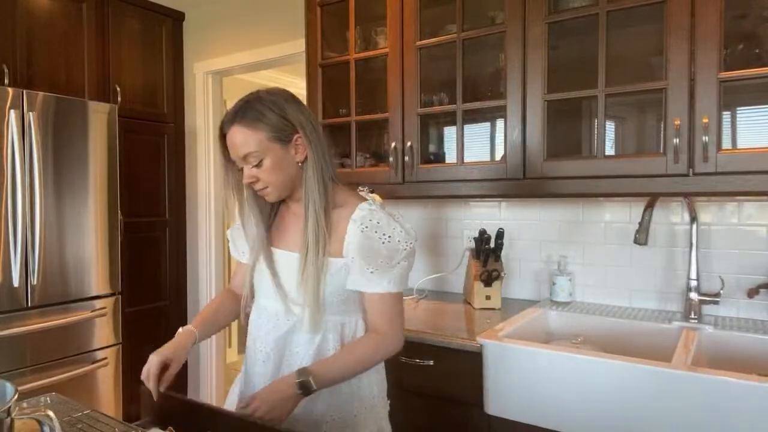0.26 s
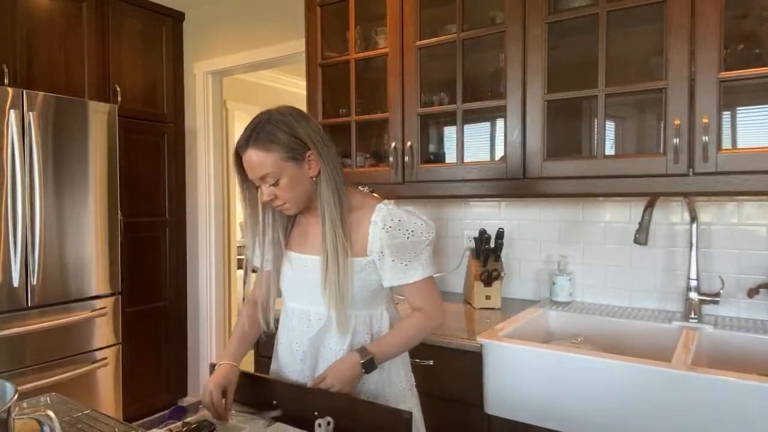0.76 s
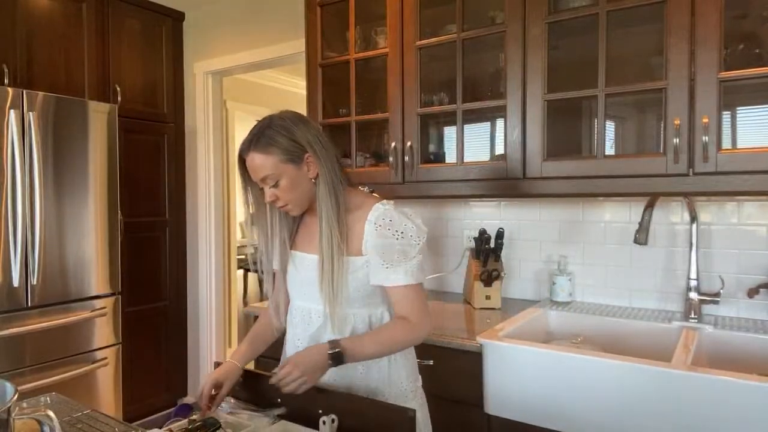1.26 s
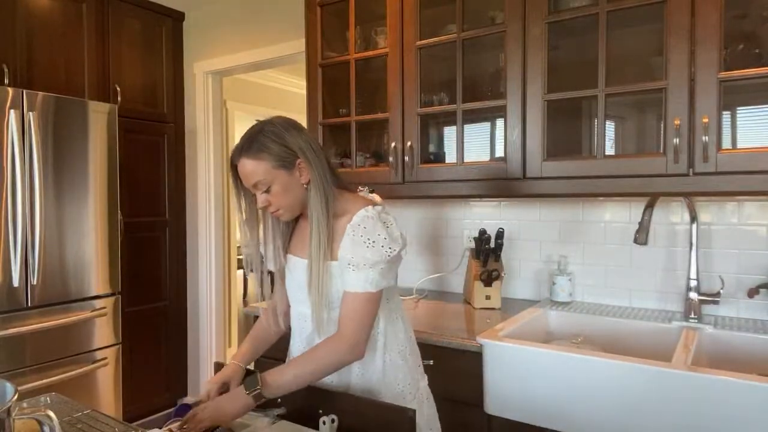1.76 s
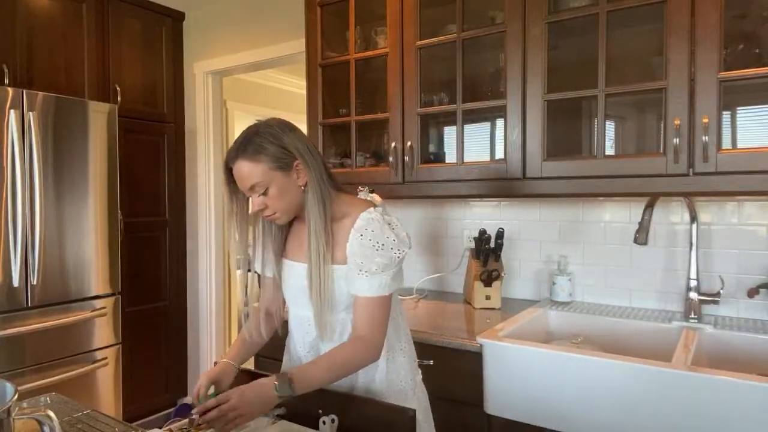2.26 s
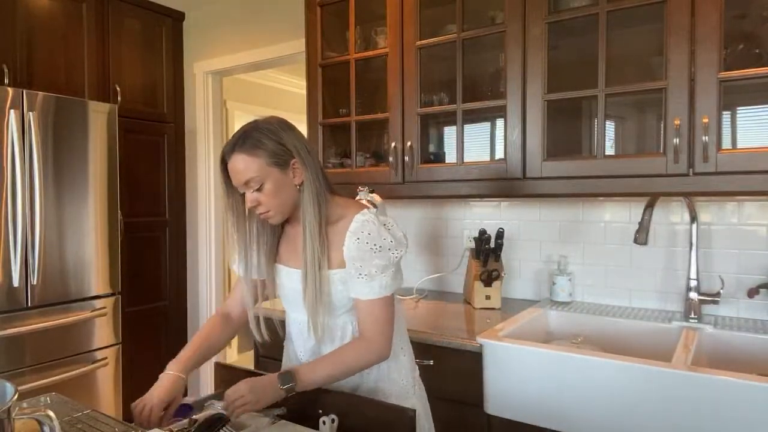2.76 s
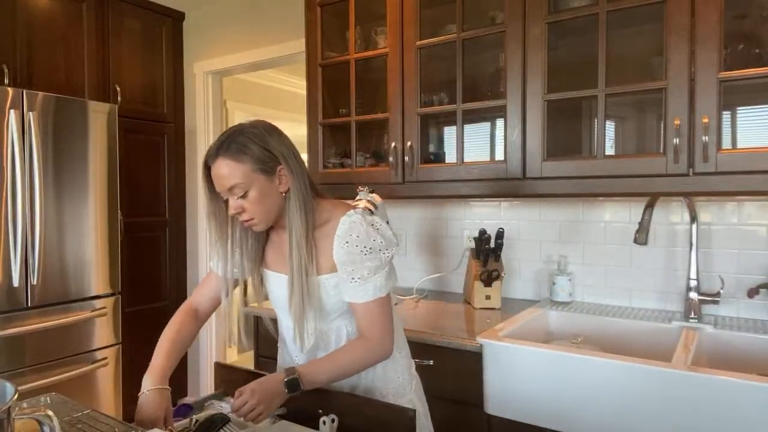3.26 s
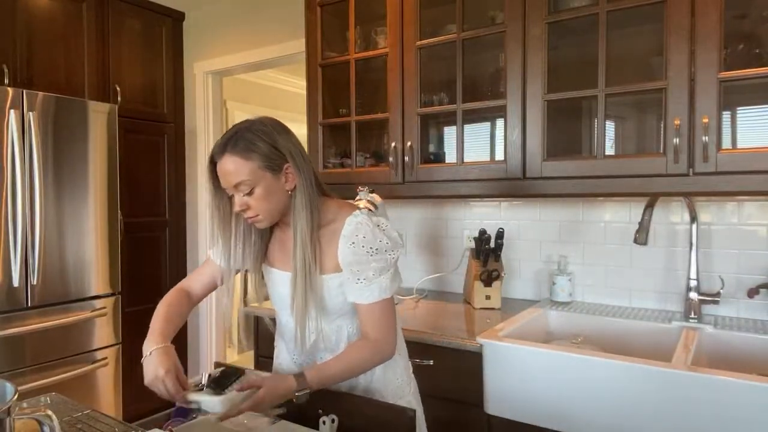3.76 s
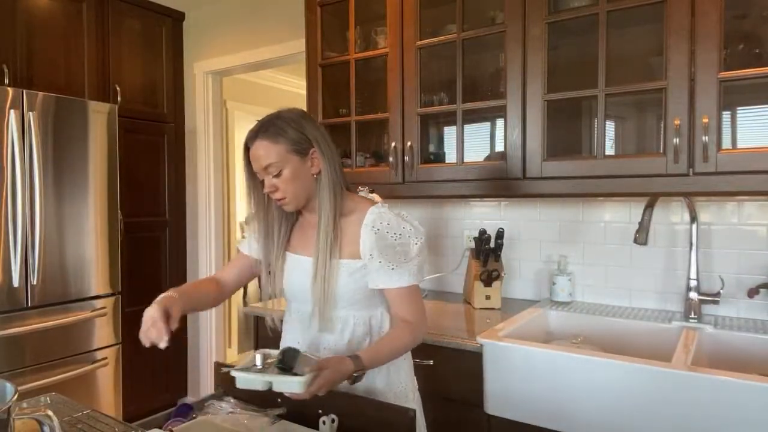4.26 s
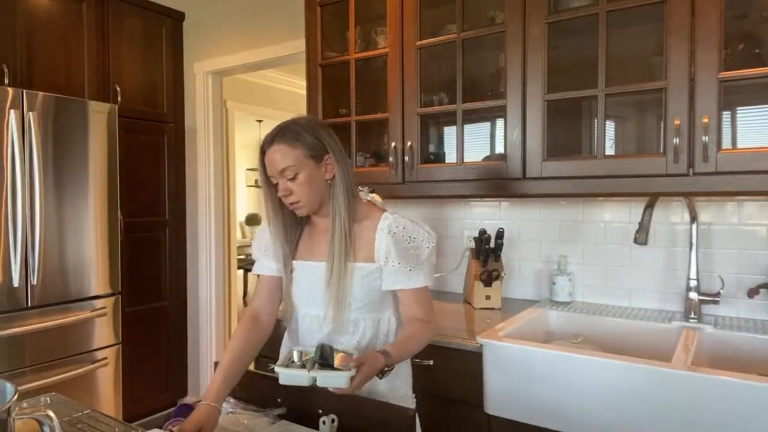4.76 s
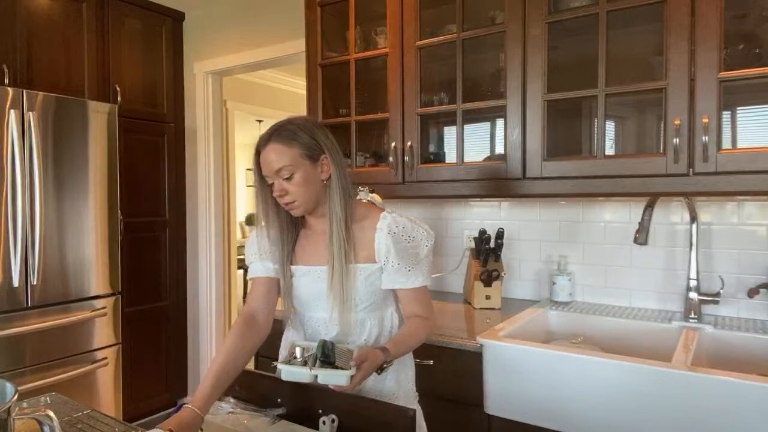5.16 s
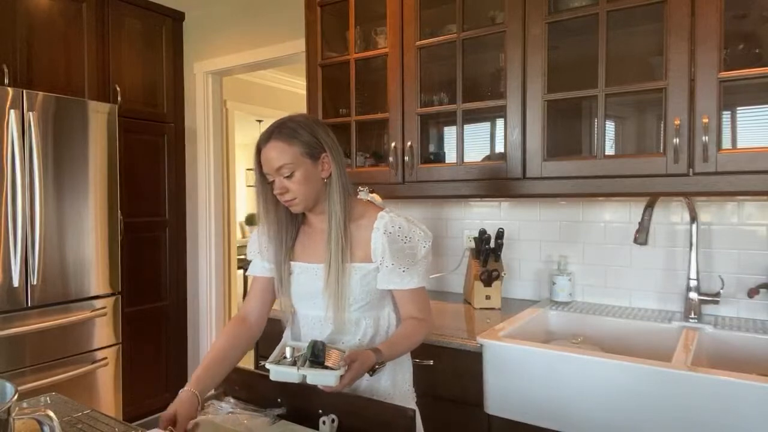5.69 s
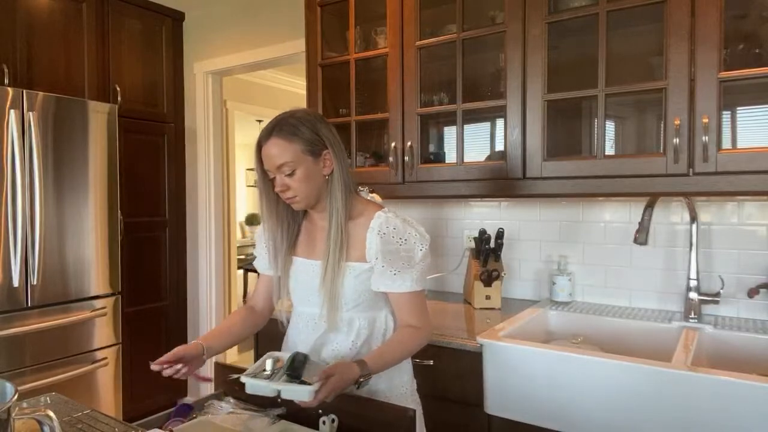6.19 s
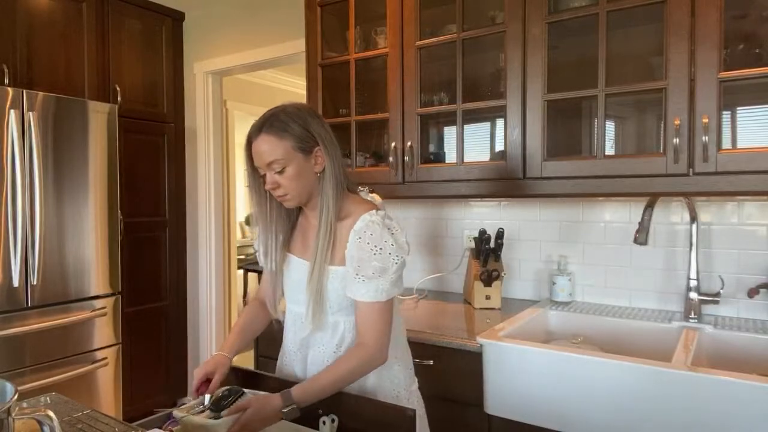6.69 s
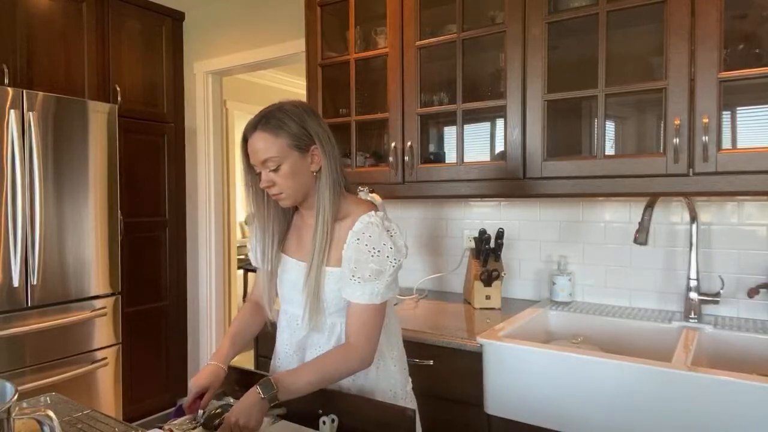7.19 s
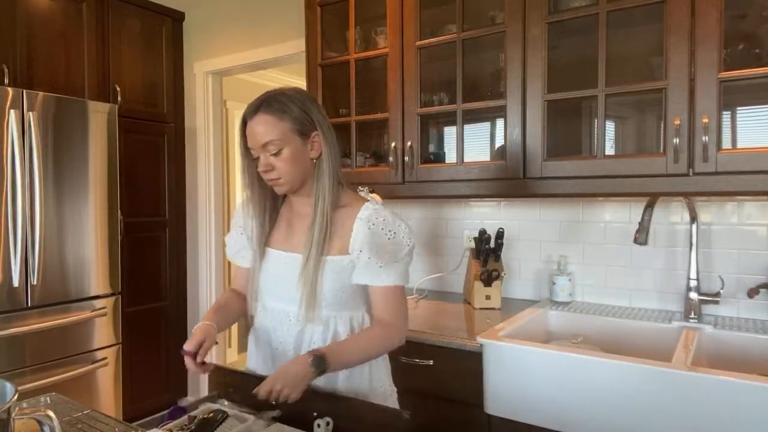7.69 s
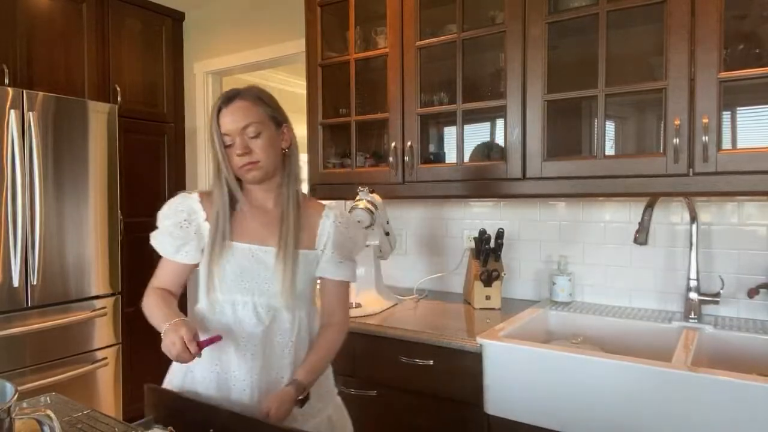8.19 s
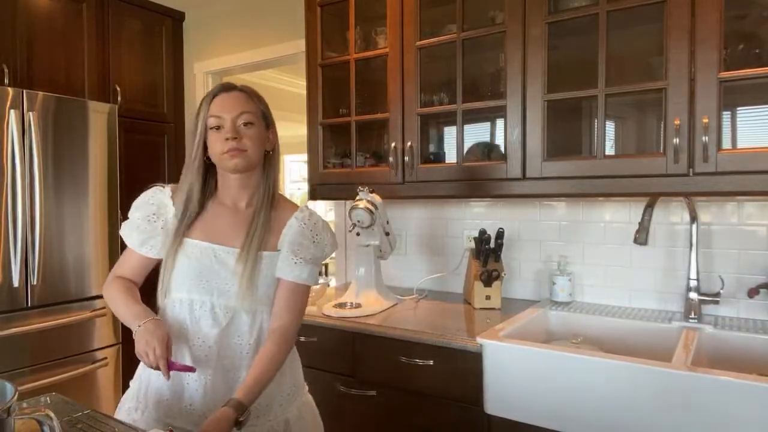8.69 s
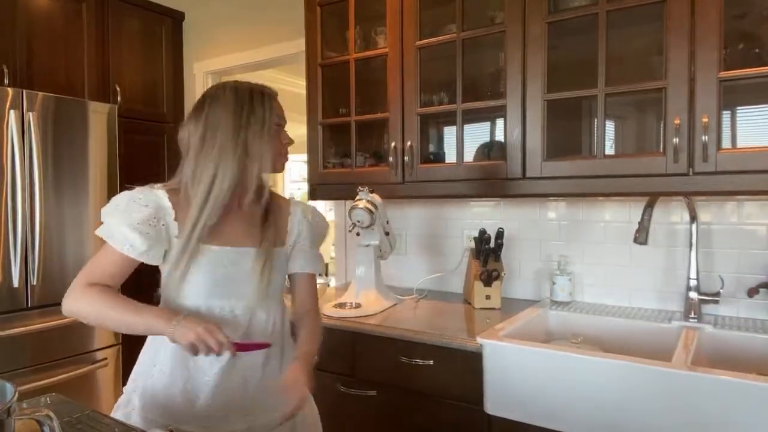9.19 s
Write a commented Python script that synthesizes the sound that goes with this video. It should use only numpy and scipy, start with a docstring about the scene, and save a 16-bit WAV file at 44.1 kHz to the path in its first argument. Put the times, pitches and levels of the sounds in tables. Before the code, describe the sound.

A wooden kitchen drawer rolls open, utensils clack, scrape and clink in a plastic tray, then the drawer rolls back and thuds shut.

```python
"""Searching a kitchen drawer

A wooden drawer rolls open on rumbling runners; someone rummages in its plastic utensil tray.
Struck modes make knocks, clinks and handle taps; random slips make slides. The drawer rolls back and thuds shut.
The hard kitchen adds a decaying noise tail, over faint air noise and wavering hum tones.
Both channels are alike; twice the sound fades quickly to silence and snaps back."""
import sys
import numpy as np
from scipy import signal
from scipy.fft import rfft, irfft
from scipy.io import wavfile

SR = 44100
rng = np.random.default_rng(int(sys.argv[2]) if len(sys.argv) > 2 else 0)


def materialize(psi):
    """Save the field psi as 16-bit PCM at rate SR to the path in sys.argv[1].

    A 1-D psi becomes a single channel; in a 2-D psi each row is a channel.
    """
    bounded = np.clip(np.atleast_2d(psi).T, -1, 1)
    quanta = np.round(bounded * 32767).astype(np.int16)
    wavfile.write(sys.argv[1], SR, quanta)


N = 416304
TIME = np.arange(N) / SR
RING = TIME[:SR // 2]  # time axis of one struck sound, s
TOP_HZ = 15800  # upper edge of the whole sound
MIDDLE_NOTE_HZ = 879  # note of a utensil of middling weight

# utensils sliding over each other; levels are relative, ahead of the slide trim and the room:
# start_s, end_s, body_db, hiss_db, resonance_hz of the rubbed piece
UTENSIL_SLIDES = [(0.255, 0.436, -56.5, -73, 5600), (1.648, 1.756, -52.5, -56.5, 5270),
                  (1.742, 1.8, -42, -44.5, 13400), (2.42, 2.505, -58, -78, 1116),
                  (3.019, 3.15, -61, -79, 4950), (3.142, 3.173, -45.5, -49, 3000),
                  (3.215, 3.277, -53, -56.5, 4900), (3.265, 3.348, -53, -53, 5300),
                  (3.417, 3.501, -60, -70, 13000), (4.045, 4.206, -54, -68.5, 1350),
                  (4.75, 4.973, -60, -68, 1300), (4.952, 5.08, -46.5, -56.5, 1540),
                  (5.216, 5.28, -45.5, -51.5, 9200), (5.285, 5.353, -53.5, -54.5, 2540),
                  (5.42, 5.672, -48, -61.5, 515), (5.723, 5.77, -52, -69, 560),
                  (5.777, 5.848, -47, -57, 1870), (5.832, 5.945, -46.5, -56, 3270),
                  (6.925, 7.255, -54.5, -72, 1100), (8.757, 8.791, -53, -54, 7600),
                  (8.808, 8.848, -49, -52.5, 10000), (8.85, 8.932, -54.5, -65, 4050),
                  (9.115, 9.23, -59, -51.5, 13900), (9.363, 9.406, -47.5, -52.5, 4260)]


def undb(db):
    """Decibels to gain."""
    return 10 ** (np.asarray(db) / 20)


def unit(x):
    """Scale to rms 1."""
    return x / np.sqrt(np.mean(x ** 2))


def blow(x):
    """Scale a transient to the energy of one millisecond at rms 1."""
    return x / np.sqrt(np.sum(x ** 2) / (SR / 1000))


def add(track, s, x):
    """Mix x into the track from time s."""
    i = max(int(s * SR), 0)
    track[i:i + len(x)] += x[:max(N - i, 0)]


def along(points, hz):
    """Read (Hz, value) points on a log-frequency axis."""
    f, value = np.transpose(points)
    return np.interp(np.log(hz + 1), np.log(f), value)


def colour(x, points):
    """Causal filter with the given spectrum, built from its cepstrum."""
    size = 4096
    level_db = along(points, np.fft.rfftfreq(size, 1 / SR))
    cepstrum = irfft(np.log(undb(level_db)))
    # fold the cepstrum forward in time for minimum phase
    cepstrum[1:size // 2] *= 2
    cepstrum[size // 2 + 1:] = 0
    impulse = irfft(np.exp(rfft(cepstrum)))
    return signal.fftconvolve(x, impulse)[:len(x)]


def band(x, hz, kind, order=2):
    """Butterworth filter."""
    return signal.sosfilt(signal.butter(order, hz, kind, fs=SR, output="sos"), x)


def decay(t, t60):
    """Exponential fall of 60 dB in t60 seconds."""
    return np.exp(-np.log(1000) * t / t60)


def ring(modes, scatter_db, detune):
    """Decaying modes; where the blow lands changes each one's strength, sign and, slightly, pitch."""
    hz, db, t60 = np.transpose(modes)[:, :, None]
    strength, pitch, side = rng.standard_normal((3, len(modes), 1))
    waves = np.sin(2 * np.pi * hz * (1 + detune * pitch) * RING) * np.sign(side)
    envelopes = undb(db + scatter_db * strength - 60 * RING / t60)
    return blow(np.sum(envelopes * waves, axis=0))


def contact(chatter_s, rebound=.5, count=4):
    """One push broken into a train of tiny rebounds by a chain of all-pass echoes."""
    hz = np.fft.rfftfreq(len(RING), 1 / SR)
    delay_samples = np.ceil(SR * chatter_s * rng.uniform(.1, 1, (count, 1)))
    echo = np.exp(-2j * np.pi * hz * delay_samples / SR)
    keep = np.clip(rebound, 0, .8)
    all_passes = (echo - keep) / (1 - keep * echo)
    return blow(irfft(np.prod(all_passes, axis=0)))


def grains(rate, spread_db):
    """Tiny slips at random moments (rate per second), a few of them much stronger than the rest."""
    size = undb(spread_db * np.minimum(rng.exponential(size=N), 4))
    return unit((rng.random(N) < rate / SR) * size * rng.choice([-1, 1], N))


def walk(rate):
    """Slow random wandering through `rate` knots per second, with a spread near 1."""
    knots = rng.standard_normal(1000)
    return np.interp(TIME * rate, np.arange(len(knots)), knots)


def kitchen(x, direct_db, room_db, early_db, first_s=0.00094, build_s=0.0032, early_s=0.012):
    """Direct sound, early reflections from drawer and counter, then a noise tail whose mids last longest."""
    # decay time of the room tail in each band: centre_hz, t60_s
    room_decay = [(125, 0.24), (400, 0.42), (1000, 0.5), (2500, 0.55), (5000, 0.49), (9000, 0.4),
                  (15000, 0.24)]
    t = TIME[:SR * 3 // 4]
    hz, spectrum = np.fft.rfftfreq(2 * len(t), 1 / SR), rfft(rng.standard_normal(2 * len(t)))
    tail = 0
    for centre, t60 in room_decay:
        share = along([(f, f == centre) for f, _ in room_decay], hz)  # crossfade between bands
        tail = tail + irfft(spectrum * share)[:len(t)] * decay(t, t60)
    early_boost = 1 + undb(early_db) * np.exp(-t / early_s)
    tail *= np.clip((t - first_s) / build_s, 0, 1) * early_boost
    tail /= np.sqrt(np.sum(tail ** 2))
    return undb(direct_db) * x + undb(room_db) * signal.fftconvolve(x, tail)[:N]


def background(air_db=-58, air_waver_db=0.8, hum_db=-2):
    """Gently wavering air noise and the wavering tones of a running appliance."""
    # spectrum of the air noise, relative: frequency_hz, density_db per Hz
    air_spectrum = [(15, -78), (25, -61.5), (71, -10.5), (110, -9.5), (140, -2), (240, -2.5), (322, -4.5),
                    (349, -7.5), (457, -6), (666, -10.5), (1140, -14), (1270, -13), (1750, -18),
                    (2230, -19), (15500, -40)]
    # appliance tones ahead of the hum trim: pitch_hz, level_db
    hum_tones = [(242.2, -69.5), (360.7, -77), (651.4, -67.5), (1012, -74.5), (1308, -74.5), (2164, -83)]
    air = unit(colour(rng.standard_normal(N), air_spectrum))
    air *= undb(air_db + air_waver_db * walk(rate=8.7))
    hum = np.zeros(N)
    for hz, db in hum_tones:
        waver = walk(rate=12) + 1j * walk(rate=11)  # wanders in level and phase
        hum += undb(db) * unit(np.real(waver * np.exp(2j * np.pi * hz * TIME)))
    return air + undb(hum_db) * hum


def drawer_roll(speed_up_s=0.017, coast_db_per_s=117, bump_db=2):
    """Bearings rumble over small bumps in the runners; each stroke speeds up, holds and coasts to rest."""
    # spectrum of the rolling rumble, relative: frequency_hz, density_db per Hz
    runner_spectrum = [(35, -70.5), (60, -15), (102, -12.5), (139, -7), (210, -5), (272, 1), (351, -13.5),
                       (403, 1.5), (509, -8.5), (810, -10.5), (1350, -17.5), (1960, -26), (2470, -26),
                       (5580, -32.5), (15500, -40)]
    # pulls and pushes ahead of the room; the coast follows the end: start_s, end_s, rumble_db
    roll_strokes = [(0, 0.514, -50.5), (7.789, 8.697, -53), (8.763, 8.843, -46.5)]
    rumble = unit(colour(grains(rate=4000, spread_db=3.0), runner_spectrum))
    strokes = []
    for start, end, db in roll_strokes:
        speed_up = np.clip((TIME - start) / speed_up_s, 0, 1)
        coast = undb(db - coast_db_per_s * np.maximum(TIME - end, 0))
        strokes.append(speed_up * coast)
    return rumble * np.max(strokes, axis=0) * undb(bump_db * walk(rate=22))


def drawer_blows():
    """Light bumps, then three blows per landing: (s, dB, lowest Hz, cut-off Hz, panel ring dB, boom dB)."""
    # the open drawer bumping in its runners: start_s, level_db, cutoff_hz of the contact, boom_db of the box
    runner_bumps = [(0.066, -34, 1000, -22), (0.08, -31, 450, -19), (0.196, -37, 300, -3),
                    (3.255, -35.5, 497, -16), (4.95, -36, 398.2, 0.5), (5.133, -28, 377, -16),
                    (5.149, -27.5, 418, -18), (5.226, -38.5, 300, -1), (5.44, -33.5, 410, -7),
                    (5.715, -33, 700, -19), (5.834, -33.5, 400, -3), (7.258, -24, 494, -7),
                    (7.985, -34.5, 450, -20.5), (8.036, -40, 302, 0.5)]
    # the drawer shuts, springs back and lands again; base values that each landing blow alters:
    # start_s, level_db, cutoff_hz of the contact, boom_db
    shut_landings = [(9.092, -11.5, 5430, 1), (9.265, -25, 730, 8)]
    # the front strikes, the box follows, the load settles; levels and boom add to those of the shut:
    # delay_s, level_db, cutoff_share (ratio), panel_ring_db, boom_db
    landing_blows = [(0, 2, 1.07, -4.5, -31), (.008, -3, 1.4, 4.5, -5), (0.0217, -10.5, 0.17, 1, 5)]
    # a light bump barely rings the panels, and its wood sound carries no deep bass
    blows = [(s, db, 132, hz, -13.5, boom_db) for s, db, hz, boom_db in runner_bumps]
    for s, db, hz, box_db in shut_landings:
        for delay, blow_db, share, panel_db, boom_db in landing_blows:
            # shutting shakes the whole cabinet, so the bass reaches down to 35.2 Hz
            blows.append((s + delay, db + blow_db, 35.2, hz * share, panel_db, boom_db + box_db))
    return blows


def drawer_thuds(boom_hz=148, boom_t60=0.09, swell_s=0.0068):
    """The wooden panels ring, duller under a soft contact; the boom of the whole box swells a little later."""
    # spectrum of the wooden contact, relative: frequency_hz, density_db per Hz
    slam_spectrum = [(60, -2), (150, -1), (400, 1.5), (650, 3.5), (1100, 5.5), (2000, -4.5), (4000, -12),
                     (8000, -15.5), (15500, -9)]
    # resonances of the drawer box, ahead of random scatter: pitch_hz, level_db, t60_s
    panel_modes = [(220, -5, 0.051), (361, 5.5, 0.07), (391, 2, 0.092), (425, -1.5, 0.092),
                   (500, -3, 0.049), (700, -16, 0.065), (887, 1.5, 0.032), (1010, 0, .05),
                   (1020, -11, 0.031), (1150, -22, 0.031), (1345, -4, 0.07)]
    swell = 1 - np.exp(-RING / swell_s)
    boom = blow(np.sin(2 * np.pi * boom_hz * RING) * swell * decay(RING, boom_t60))
    out = np.zeros(N)
    for s, db, lowest_hz, cutoff_hz, panel_db, boom_db in drawer_blows():
        crack = blow(colour(contact(chatter_s=.0018, rebound=0.71), slam_spectrum))
        hit = crack + undb(panel_db) * ring(panel_modes, scatter_db=0.5, detune=0.0043)
        wood = band(hit, lowest_hz, "high", order=4)
        wood = band(wood, min(cutoff_hz, TOP_HZ), "low", order=3)
        add(out, s, undb(db) * (blow(wood) + undb(boom_db) * boom))
    return out


def utensil_slides(split_hz=3800, edge_s=0.0096, jerk_db=3, slide_db=-2, sing_db=3, sharpness=6):
    """Uneven stick and slip: the tray gives the body, the metal the hiss; the rubbed piece lifts its own band."""
    # spectrum of the slips, relative: frequency_hz, density_db per Hz
    scrape_spectrum = [(90, -25.5), (200, 8), (600, 4.5), (1100, -2), (2000, -1), (3300, -6), (4200, -8),
                       (5300, -6.5), (8000, -10.5), (11000, -13), (15500, -23)]
    slips = colour(grains(rate=900, spread_db=5.0), scrape_spectrum) * undb(jerk_db * walk(rate=45))
    out = np.zeros(N)
    for start, end, body_db, hiss_db, hz in UTENSIL_SLIDES:
        during = (TIME > start) & (TIME < max(end, start + edge_s))
        singing = signal.lfilter(*signal.iirpeak(hz, sharpness, fs=SR), slips[during])
        rub = slips[during] + undb(sing_db) * singing
        body = unit(band(rub, split_hz, "low", order=3))
        hiss = unit(band(rub, split_hz, "high", order=3))
        push = np.clip(np.minimum(TIME[during] - start, end - TIME[during]) / edge_s, 0, 1)
        add(out, start, push * (undb(body_db) * body + undb(hiss_db) * hiss))
    return undb(slide_db) * out


def cutlery_clinks(tick_db=-5, clink_db=-1, pinched_db=1.0, pinched_t60=0.008):
    """A bright tick sets a piece ringing until its neighbours damp it; a like piece pinched under it only clacks."""
    # pieces clinking together, ahead of the clink trim and the room: start_s, level_db, piece (name)
    clink_events = [(1.742, -29, "tongs"), (1.771, -46, "tongs"), (2.518, -31, "knife"),
                    (2.519, -35, "tongs"), (3.156, -46, "tongs"), (4.156, -40.5, "spoon"),
                    (4.243, -45.5, "spoon"), (4.906, -48, "knife"), (4.968, -41, "teaspoon"),
                    (5.217, -37.5, "teaspoon"), (5.24, -39.5, "tongs"), (5.655, -46, "teaspoon"),
                    (5.782, -37.5, "knife"), (5.904, -43, "whisk"), (6.967, -43, "peeler"),
                    (7.036, -46.5, "knife"), (7.165, -50, "fork"), (7.2, -46, "fork"), (7.265, -38, "fork"),
                    (8.761, -45, "ladle"), (8.822, -47, "ladle"), (9.115, -40, "whisk")]
    # bending modes of each named piece, ahead of random scatter: pitch_hz, level_db, t60_s
    piece_modes = { "fork": [(2950, 5, 0.06), (7150, -5, .08), (9150, 1, .16), (11280, -3, .08),
                   (12850, 1, 0.1), (13500, 0, .05), (14944, -6, 0.08)], "tongs": [(8200, -6, 0.089),
                   (9000, -5, .15), (10000, 4, .05), (11000, 0, .06), (12700, -12, 0.21), (13000, -1.5, .1),
                   (13695, 4, 0.053), (14944, -4, .18)], "spoon": [(2750, 2, 0.066), (5813, 0, 0.072),
                   (8300, -2, 0.12), (8010, -2, 0.067), (8020, 3, 0.067), (10500, -8, 0.11),
                   (10830, -10, .12), (13565, -8, .1), (14211, 4, .05)], "peeler": [(3100, 8, .02),
                   (3600, 1, .015), (4570, 0, .02), (5070, -3, .03), (7407, -8, .03)],
                   "ladle": [(4010, 5, .1), (4150, 3, .03), (5938, -5, .02), (7550, 3, .012),
                   (9986, -2, .02), (13050, -5, .012), (14300, -4, .012)], "whisk": [(4150, 0, 0.081),
                   (7400, 4, 0.055), (10000, 3, 0.11), (11900, 3, .1), (12273, -3, .1), (14298, 0, .12),
                   (15460, -5, .1)], "teaspoon": [(3260, 14, 0.027), (5840, 1, .04), (6670, -8, .04),
                   (10766, -6, 0.038), (12187, -12, .05), (12700, -11, .06)], "knife": [(1870, 3, 0.067),
                   (6020, 2.5, 0.065), (6270, 0, 0.052), (7550, 1.5, .06), (8290, -1, 0.089),
                   (8720, -7.5, .06), (11757, -14.5, .06), (13700, -13.5, .06)]}
    out = np.zeros(N)
    for s, db, piece in clink_events:
        tick = blow(band(contact(chatter_s=0.0048, rebound=0.37), 4500, "high"))
        free = ring(piece_modes[piece], scatter_db=1.5, detune=.004)
        short_modes = [(hz, mode_db, pinched_t60) for hz, mode_db, _ in piece_modes[piece]]
        pinched = ring(short_modes, scatter_db=2, detune=.025)
        clink = free + undb(pinched_db) * pinched + undb(tick_db) * tick
        add(out, s, undb(db + clink_db) * clink)
    return out


def handle_clacks(clack_db=2, lowest_hz=420, t60=0.018):
    """Plastic and wooden handles tap: three well-damped resonances, no crack, and too small to give bass."""
    # handles tapping each other, ahead of the clack trim and the room:
    # start_s, level_db, first_hz, second_hz, third_hz, tilt_db per octave above the first
    handle_taps = [(0.661, -47, 1410, 2000, 2450, 1), (0.858, -52.5, 1320, 2500, 3140, -4),
                   (1.568, -37, 760, 1420, 2170, -16), (1.586, -35, 750, 1500, 1980, 0),
                   (1.625, -38, 1370, 2220, 3700, -6), (1.876, -35, 1010, 1850, 2880, -6.5),
                   (2.324, -32.5, 580, 1200, 1860, -3), (2.494, -18, 1020, 1710, 2300, -4.5),
                   (2.523, -21, 700, 1020, 1100, -4), (2.541, -25.5, 950, 1900, 2150, -2),
                   (3.15, -35.5, 640, 1330, 2800, -3), (4.243, -36.5, 810, 2010, 3300, -1.5),
                   (6.922, -48.5, 1220, 2870, 3660, -2), (6.967, -38.5, 860, 1390, 2590, -13),
                   (7.026, -37, 835, 1150, 1400, -6), (7.1, -45, 1080, 2210, 2540, 3),
                   (7.163, -41, 860, 1310, 2210, -5), (7.203, -40.5, 1020, 2245, 2600, -4),
                   (7.461, -44, 890, 1340, 1870, -7)]
    out = np.zeros(N)
    for s, db, *notes_hz, tilt_db in handle_taps:
        modes = [(hz, tilt_db * np.log2(hz / notes_hz[0]), t60) for hz in notes_hz]
        add(out, s, undb(db + clack_db) * ring(modes, scatter_db=1, detune=.005))
    return band(out, lowest_hz, "high", order=3)


def jostles(per_s=14, jostle_db=6, spread_db=1, spread_octaves=0.45, hardness_db=-4.5):
    """A sliding utensil jostles its neighbours: soft knocks at random moments, stronger when the slide is."""
    rows = []
    for start, end, body_db, _, _ in UTENSIL_SLIDES:
        waits, sizes, notes = rng.exponential(size=16), rng.standard_normal(16), rng.standard_normal(16)
        moments = start + np.cumsum(waits) / per_s
        for s, size, note in zip(moments, sizes, notes):
            if s < end:
                level_db = body_db + jostle_db + spread_db * size
                note_hz = MIDDLE_NOTE_HZ * 2 ** (spread_octaves * note)
                rows.append((s, level_db, hardness_db, note_hz))
    return rows


def tray_knocks(knocks, bass_hz=400, clack_hz=1600, treble_hz=4200, modes_db=-5, note_db=-7, note_t60=0.045,
                bass_db=-13, body_db=-1, clack_db=-5.5, treble_db=-12):
    """Knocks ring tray and handle; force shifts the bass, hardness lifts clack and treble."""
    # spectrum of the contact, relative: frequency_hz, density_db per Hz
    contact_spectrum = [(80, -34), (160, 2.5), (300, -3), (560, 3), (1050, 3), (1500, -1.5), (2100, -6),
                        (3200, -11), (4500, -16.5), (7000, -19), (11000, -26.5), (15500, -29)]
    # resonances of the plastic tray, ahead of random scatter: pitch_hz, level_db, t60_s
    plastic_modes = [(457, -2.5, 0.077), (580, 5, 0.038), (648, 2, 0.032), (777.6, 7.5, 0.072),
                     (910, -2, 0.086), (1023, 3.5, 0.068), (1100, 0, 0.075), (1200, -7.5, 0.063),
                     (1500, -13, 0.049), (1893, -2.5, 0.07), (1980, -13, 0.035), (2260, -19, .04),
                     (2474, -0.5, .04), (2800, -16, .04)]
    middle_blow_db = -31.5
    # a lighter utensil has a higher note, less bass and more clack
    bass_db_per_octave, clack_db_per_octave = -14, 6.5
    bass_per_force = -0.35  # a faster blow has a shorter contact: dB of bass per dB above a middling blow
    clack_per_hardness = 0.27  # share of the hardness that also lifts the clack
    # longest rebound spacing of a middling knock; this much more force halves it
    middle_chatter_s, chatter_halves_db = .0016, 22
    out = np.zeros(N)
    for s, db, hardness_db, note_hz in knocks:
        lightness = np.log2(note_hz / MIDDLE_NOTE_HZ)  # octaves
        force_db = db - middle_blow_db
        chatter_s = middle_chatter_s * 2 ** (-force_db / chatter_halves_db)
        crack = blow(colour(contact(chatter_s, rebound=0.53), contact_spectrum))
        hit = crack + undb(modes_db) * ring(plastic_modes, scatter_db=2.5, detune=0.015)

        note = blow(np.sin(2 * np.pi * note_hz * RING) * decay(RING, note_t60))
        bass = blow(band(crack, bass_hz, "low", order=4))
        body = blow(band(hit, [bass_hz, clack_hz], "band", order=3))
        clack = blow(band(hit, [clack_hz, treble_hz], "band", order=3))
        treble = blow(band(crack, treble_hz, "high", order=4))

        knock = undb(note_db) * note + undb(body_db) * body
        knock += undb(bass_db + bass_db_per_octave * lightness + bass_per_force * force_db) * bass
        knock += undb(clack_db + clack_db_per_octave * lightness + clack_per_hardness * hardness_db) * clack
        knock += undb(treble_db + hardness_db) * treble
        add(out, s, undb(db) * knock)
    return out


def scene(low_cut_hz=85):
    """Each source reaches the room by its own paths and radiates little deep bass; both channels are alike."""
    # utensils knocking on the tray, levels ahead of the room:
    # start_s, level_db, hardness_db of the contact, note_hz of the utensil
    knock_events = [(0.415, -41, 2.5, 837), (1.578, -42, 5.5, 915), (1.625, -43, 5, 2000),
                    (1.732, -29, 3, 913), (1.754, -29.5, 7, 644), (1.876, -38, 2, 1020),
                    (2.323, -27, -4, 1085), (2.494, -17, -5.5, 990), (2.518, -16.5, 0, 1042),
                    (3.016, -51, 8.5, 1310), (3.151, -31, -0.5, 1023), (3.646, -52.5, 13, 1300),
                    (3.704, -46, 5.5, 803), (4.045, -39, 1, 1002), (4.07, -42, -9, 1407),
                    (4.243, -37, 2.5, 1255), (4.904, -48.5, 19.5, 1680), (4.974, -38, 13.5, 1500),
                    (5.023, -39, 10, 1460), (5.064, -35, -4, 810), (5.26, -23.5, -1.5, 920),
                    (5.419, -38.5, 1, 900), (5.474, -33, -11, 700), (5.51, -34.5, -3, 1000),
                    (5.561, -26.5, -4.5, 566), (5.601, -32.5, -17, 500.6), (5.709, -28, -13, 550),
                    (5.892, -35, -1, 1250), (6.502, -34.5, 7, 1095), (6.922, -42.5, 1.5, 840),
                    (7.026, -35, -17, 1000), (7.04, -37, 1, 794), (7.1, -42, -4, 430),
                    (7.163, -38.5, 3.5, 700), (7.251, -31, -8, 516), (7.259, -24, 0, 917),
                    (7.268, -26, -2.5, 1110)]
    air = background()
    drawer = kitchen(drawer_roll() + drawer_thuds(), direct_db=-2.5, room_db=-2, early_db=-17.5)
    metal = kitchen(utensil_slides() + cutlery_clinks(), direct_db=-3.5, room_db=-2.0, early_db=0.0)
    tray_dry = handle_clacks() + tray_knocks(knock_events + jostles())
    tray = kitchen(tray_dry, direct_db=-0.5, room_db=0.5, early_db=2.0)
    sources = band(tray + metal + drawer, low_cut_hz, "high", order=3)
    return np.tile(sources + air, (2, 1))


def record(dry, fade_db_per_s=410, return_s=0.003):
    """Twice the sound fades quickly to silence and snaps back; a steep low-pass cuts the top."""
    # silences: fade_start_s, return_start_s
    silent_gaps = [(3.837, 4.04), (8.054, 8.248)]
    gain = np.ones(N)
    for start, end in silent_gaps:
        fade = undb(-fade_db_per_s * np.maximum(TIME - start, 0))
        comeback = np.clip((TIME - end) / return_s, 0, 1)
        gain *= np.maximum(fade, comeback)
    top_cut = signal.ellip(10, .2, 80, TOP_HZ, fs=SR, output="sos")
    return signal.sosfilt(top_cut, dry * gain)


dry = scene()
out = record(dry)
materialize(out)
```